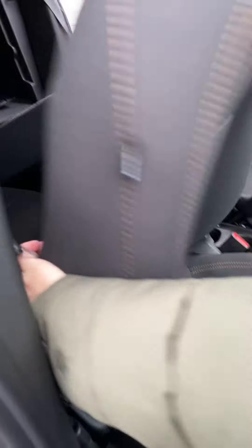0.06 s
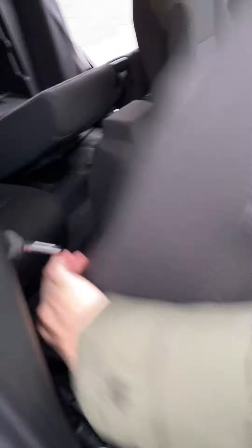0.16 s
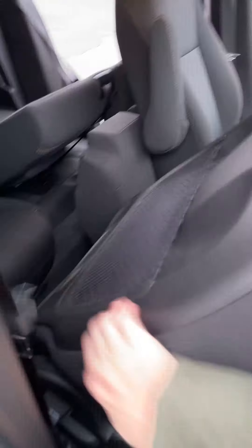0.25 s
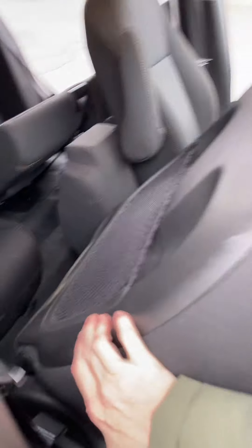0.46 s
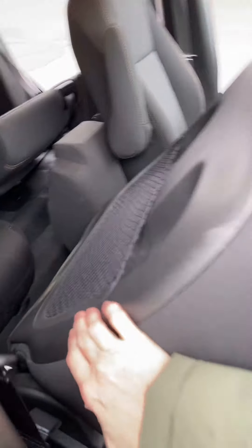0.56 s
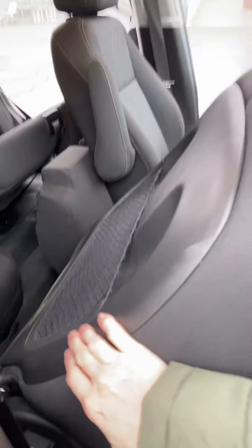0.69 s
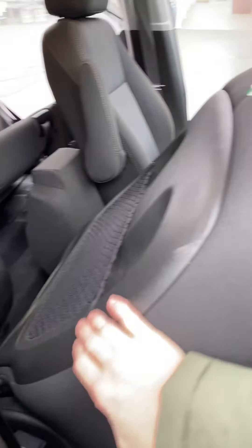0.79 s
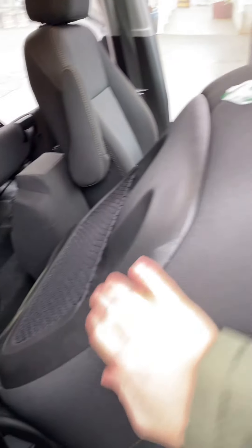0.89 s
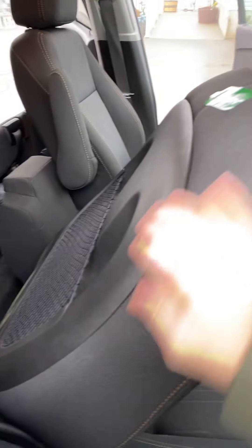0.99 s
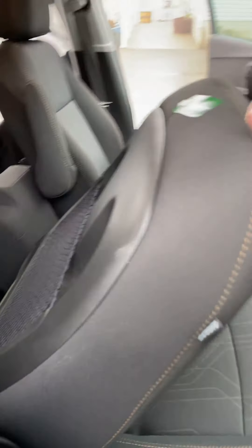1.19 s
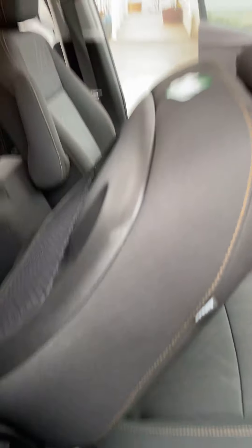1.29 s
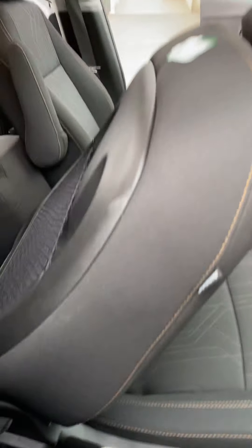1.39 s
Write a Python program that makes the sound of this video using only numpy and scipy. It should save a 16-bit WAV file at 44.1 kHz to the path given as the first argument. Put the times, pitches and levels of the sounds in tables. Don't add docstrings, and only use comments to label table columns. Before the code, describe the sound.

A car seat back folds down inside a padded cabin. Light knocks and sleeve rustle come first, then at 0.23 s a loud, slightly distorted slam of rapid blows, with low steel ring, rattle, bright cracks and a puff of air, fading by 0.4 s. Dull sagging knocks follow from 0.6 to 0.9 s, strongest near 0.75-0.85. Faint thumps come after 1.2 s over low rumble and soft street hiss.

```python
import sys
import numpy as np
from scipy import signal
from scipy.fft import rfft, irfft
from scipy.io import wavfile
from scipy.ndimage import uniform_filter1d, map_coordinates

SR = 44100
rng = np.random.default_rng(int(sys.argv[2]) if len(sys.argv) > 2 else 0)


def wrap_up_sound(samples):
    columns = np.atleast_2d(samples).T
    tamed = np.clip(columns, -1, 1)
    steps = np.round(tamed * 32767).astype(np.int16)
    wavfile.write(sys.argv[1], SR, steps)


def linear_from_db(decibels):
    return 10 ** (np.asarray(decibels, float) / 20)


N = 63945

CLOTH_FLUTTER_DB = 1.2


def unit(x):
    return x / np.sqrt(np.mean(x ** 2) + 1e-20)


def along(points, hz):
    f, v = np.transpose(points)
    return np.interp(np.log(hz + 1), np.log(f + 1), v)


def curve(rows):
    return np.interp(np.arange(N) / SR, *np.transpose(rows))


def wobble(rate):
    return map_coordinates(rng.standard_normal(300), [np.arange(N) * rate / SR])


def rush(spectrum, patchy_db):
    hz, _, z = signal.stft(rng.standard_normal(N + 2048), SR, nperseg=2048)
    patches = uniform_filter1d(rng.standard_normal(z.shape), 20, 0)
    patches = unit(uniform_filter1d(patches, 3, 1))
    colour = along([(6, -120)] + list(spectrum) + [(17000, -120)], hz)[:, None]
    noise = signal.istft(z * linear_from_db(patchy_db * patches + colour), nperseg=2048)[1]
    return unit(noise[:N])


def add(track, s, sound):
    part = track[round(s * SR):][:len(sound)]
    part += sound[:len(part)]


def attack(t, rise_s):
    return 1 - np.exp(-t / rise_s)


def smooth_attack(t, rise):
    return 1 - np.exp(-(t / rise) ** 2)


def ring(modes, hardness_hz, t):
    hz, db, t60 = np.transpose(modes)[..., None]
    luck_db = rng.normal(0, 1.6, hz.shape)
    hz = hz * np.exp(0.0523 * rng.standard_normal(hz.shape))
    swell = smooth_attack(t * hz, 1.13)
    dulling = 1 + (hz / hardness_hz) ** 2
    level = linear_from_db(db + luck_db - 60 * t / t60) / dulling
    return (level * swell * np.sin(2 * np.pi * hz * t)).sum(0)


def street_hiss():
    # t/s, level/dB
    street_level = [(0, -44), (.2, -42), (.3, -45), (.43, -47.5), (.5, -45), (.68, -48), (.8, -47),
                    (1.1, -47), (1.45, -47)]
    # f/Hz, density/dB
    hiss_tone = [(250, -2), (600, -5.5), (1700, -12), (2200, -17.5), (4500, -23), (7500, -31),
                 (11000, -35.5), (15700, -39)]
    level = linear_from_db(curve(street_level) + 2 + 1.86 * wobble(8.13))
    return level * rush([(120, -3.5)] + list(hiss_tone), patchy_db=0.85)


def rumble():
    # t/s, level/dB
    shaking = [(0, -2.5), (.2, -3.5), (.26, 6.5), (.33, 12.5), (.43, 4), (.58, 0.5), (.65, 1), (.72, 5),
               (.88, 2.5), (.96, 2), (1.08, -3.5), (1.15, -0.5), (1.3, 2.5), (1.45, -3.5)]
    # f/Hz, density/dB
    rumble_tone = [(12, -59), (20, -44), (42, -8.5), (75, -1), (130, -9.5), (182, -6.5), (248, -17.5),
                   (500, -24.5), (650, -30.5), (1100, -120)]
    level = linear_from_db(-38 + curve(shaking) + 0.7 * wobble(13.0))
    return level * rush(list(rumble_tone)[:-1] + [(900, -39)], patchy_db=1.5)


def upholstery():
    # t/s, level/dB
    rubbing = [(0, -68), (.06, -59.5), (.12, -62), (.2, -53.5), (.32, -61), (.42, -62.5), (.49, -57.5),
               (.56, -61), (.7, -64.5), (.8, -61.5), (.9, -64), (1.0, -65.5), (1.2, -78), (1.33, -78),
               (1.45, -85)]
    # f/Hz, level/dB
    cloth_tone = [(1800, -5), (3000, -2.5), (5000, -2), (7500, -7), (9000, -14.5), (12000, -28),
                  (16000, -28)]
    level = linear_from_db(curve(rubbing) + 4 + CLOTH_FLUTTER_DB * wobble(28.6))
    return level * rush(cloth_tone, patchy_db=CLOTH_FLUTTER_DB)


def sleeve():
    # t/s, level/dB
    swish = [(0, -64), (.04, -61), (.13, -65.5), (.19, -61), (.24, -55), (.32, -68), (.42, -72),
             (.48, -61.5), (.55, -64), (.58, -67), (.86, -79), (.97, -66), (1.08, -62.5), (1.17, -64),
             (1.23, -66), (1.33, -65.5), (1.36, -76), (1.45, -69)]
    # f/Hz, level/dB
    sleeve_tone = [(6000, -14), (8500, -7), (10000, -5), (11500, -1), (12800, -3.5), (14000, -2),
                   (15000, -7), (16000, -14)]
    level = linear_from_db(curve(swish) + CLOTH_FLUTTER_DB * wobble(20.6))
    return level * rush(sleeve_tone, patchy_db=CLOTH_FLUTTER_DB)


def cabin(x):
    # f/Hz, t60/s
    cabin_decay = [(100, 0.24), (1000, 0.075), (10000, 0.16)]
    hz, t, z = signal.stft(rng.standard_normal(SR // 3), SR, nperseg=256)
    fade = linear_from_db(-60 * t / along(cabin_decay, hz)[:, None])
    tail = signal.istft(z * fade, SR, nperseg=256)[1]
    late = np.pad(x, (150, 0))
    return signal.fftconvolve(late, tail / np.linalg.norm(tail))[:N]


def tick():
    # t/s, level/dB, f/Hz, t60/s
    s, db, hz, t60 = (.637, -40, 4900, .014)
    out, t = np.zeros(N), np.arange(SR // 4) / SR
    add(out, s, linear_from_db(db - 60 * t / t60) * np.sin(2 * np.pi * hz * t) * attack(t, 0.0003))
    return out


def knocks(blows, body_db):
    # f/Hz, level/dB, t60/s
    cushion = [(85, -9, 0.13), (105, 20.5, 0.088), (158, -23, 0.054)]
    sag_s, rise_cycles = 0.003, 0.7
    out, t = np.zeros(N), np.arange(SR // 4) / SR
    for s, db, hz, end_hz, cycles in blows:
        turn = end_hz * t + (hz - end_hz) * sag_s * attack(t, sag_s)
        shape = smooth_attack(turn, rise_cycles) * np.exp(-(turn / cycles) ** 4)
        thud = shape * np.sin(2 * np.pi * turn)
        boom = linear_from_db(body_db) * ring(cushion, 280, t)
        add(out, s, linear_from_db(db) * (thud + boom))
    return out


def settle_knocks():
    # t/s, peak/dB, first pitch f/Hz, last pitch f/Hz, length/cycles
    settling = [(0.588, -24, 140, 98, 1.15), (0.598, -21.5, 430, 206, 1.53), (0.615, -15.5, 360, 225, 1.4),
                (.612, -26.5, 171, 148, 2.8), (.640, -25.5, 110, 85, 1.6), (0.635, -25.5, 295, 241, 2.1),
                (0.708, -31.5, 350, 308, 2.8), (.7135, -30.5, 523, 427, 2.6), (0.715, -20.5, 260, 141, 2.4),
                (0.7449, -11, 724, 115, 2.85), (0.7609, -14.5, 250, 190, 1.8), (0.775, -22, 690, 300, 2.4),
                (0.7779, -9.5, 191, 167, 1.45), (0.7953, -20, 596, 237, 2.9), (0.807, -20.5, 151, 111, 2.6),
                (.826, -19.5, 422, 229, 2.2), (0.8351, -13, 169, 126, 1.53), (0.845, -17, 463, 121, 1.8),
                (0.86, -24, 532, 218, 1.86), (0.866, -20, 125, 100, 1.8), (.728, -21, 120, 103, 1.1),
                (.895, -32, 111, 95, 2.4), (.886, -22, 364, 196, 1.93), (0.911, -30.5, 230, 189, 3.2),
                (1.221, -30, 111, 93, 2.5), (1.239, -37.5, 203, 179, 9.5), (1.292, -34, 94, 79.5, 2.9),
                (1.363, -37, 105, 92, 2.1), (1.381, -38, 253, 181, 5.6)]
    return knocks(settling, body_db=-21)


def swing_knocks():
    # t/s, peak/dB, first pitch f/Hz, last pitch f/Hz, length/cycles
    swinging = [(.0155, -27, 880, 397, 2.94), (0.022, -26, 356, 304, 4.34), (0.098, -26, 170, 129, 2.8),
                (0.111, -29.5, 332, 305, 4.3), (0.151, -23, 303, 180, 1.13), (0.177, -25, 80, 72.6, 1.6),
                (0.2287, -7.5, 893, 817, 4.9), (0.2301, 0, 264, 227, 3.12), (0.2442, -10, 229, 183, 1.8),
                (0.2548, -4.5, 185, 145, 1.97), (0.2646, -9, 300, 247, 2.6), (.277, -8.5, 360, 315, 2.8),
                (0.243, -8.5, 87, 82, 3), (0.259, -26, 159, 160.2, 9.8), (0.2508, -8.5, 1042, 1078, 6),
                (0.325, -27, 306, 300.3, 14.8), (.287, -22, 172, 152, 3.2), (0.297, -11.5, 328, 288, 3),
                (.328, -22, 420, 386, 4.6), (0.345, -14.5, 140, 88, 2.2), (0.391, -18, 160, 90, 1.9),
                (0.456, -44, 105, 96, 1.6), (0.509, -34.5, 119, 88, 1.4)]
    return knocks(swinging, body_db=-19)


def puff():
    # f/Hz, level/dB
    puff_tone = [(2500, -11), (5000, 3.5), (9000, -3.5), (12000, -11), (14500, -15), (16000, -19)]
    out, t = np.zeros(N), np.arange(SR // 2) / SR
    add(out, 0.229, linear_from_db(-42.5) * smooth_attack(t, 0.0016) * np.exp(-(t / 0.055) ** 3))
    return out * linear_from_db(2.4 * wobble(89)) * rush(puff_tone, patchy_db=CLOTH_FLUTTER_DB)


def cracks():
    # t/s, peak/dB, t60/s
    strikes = [(0.2294, -17.5, 0.01), (0.2323, -27, 0.015), (0.2376, -33, .01), (0.242, -29, .012),
               (0.2452, -33, 0.0073), (0.253, -23, 0.015), (0.256, -26, 0.007), (0.2621, -29.5, 0.016),
               (0.271, -36, 0.013), (0.2792, -33, 0.016), (0.282, -43, .012)]
    # f/Hz, level/dB
    crack_tone = [(1500, -1), (2200, 4), (3500, 3), (5500, -14), (8500, -21), (11000, -24), (14000, -16),
                  (16000, -24)]
    bursts, t = np.zeros(N), np.arange(SR // 20) / SR
    for s, db, t60 in strikes:
        add(bursts, s, linear_from_db(db - 60 * t / t60) * attack(t, 0.0003))
    return bursts * rush(crack_tone, patchy_db=0)


def slam():
    # t/s, level/dB, hardness f/Hz, rattle level/dB
    contacts = [(0.225, -35, 900, -22.5), (0.2302, -10, 2750, -8), (.233, -10, 426, -18.5),
                (0.2377, -16, 900, -17), (0.2418, -16, 1000, -17), (0.2497, -16.5, 804, -19),
                (0.2546, -11, 2450, -11.5), (0.2641, -24.5, 790, -35), (.271, -19, 900, -33),
                (0.278, -20, 600, -25), (0.299, -22, 400, -37)]
    # f/Hz, level/dB, t60/s
    frame_modes = [(85.3, -8, 0.35), (160, -2.5, 0.14), (185.7, -7.5, 0.19), (273.4, -4, 0.077),
                   (313.4, -6.5, 0.22), (372, -5.5, 0.12), (476.7, -5, 0.078), (3500, -34, 0.022),
                   (885, -16, 0.021), (1120, -8, 0.018), (1241.5, -17.5, 0.077), (1853, -0.5, 0.014),
                   (676, -7.5, 0.029), (2470, -20, 0.013)]
    # f/Hz, density/dB
    rattle_tone = [(500, -0.5), (900, -6), (1500, -13), (2300, -19), (3500, -24.5), (5000, -35.5),
                   (8000, -67), (15000, -47)]
    frame, rattle, t = np.zeros(N), np.zeros(N), np.arange(SR // 2) / SR
    fade = linear_from_db(-60 * t / 0.02) + linear_from_db(-14.5 - 60 * t / 0.11)
    burst = fade * smooth_attack(t, 0.00054)
    for s, db, hardness_hz, rattle_db in contacts:
        add(frame, s, linear_from_db(db + 6.0) * ring(frame_modes, hardness_hz, t))
        add(rattle, s, linear_from_db(rattle_db) * burst)
    return frame + rattle * rush(rattle_tone, patchy_db=3.5)


def scene():
    background = street_hiss() + rumble() + upholstery() + sleeve()
    soft = settle_knocks() + swing_knocks() + tick()
    hit = slam() + cracks() + puff()
    tail = linear_from_db(-15.5) * cabin(hit + linear_from_db(-7) * soft)
    return (background + soft + hit + tail)[None]


def low_pass(x):
    return signal.sosfilt(signal.butter(12, 15860, fs=SR, output="sos"), x)


def record(dry):
    low_cut_hz, top_hz = 42, 15800
    clip_top, clip_hard = 0.97, 4
    x = signal.sosfilt(signal.butter(3, low_cut_hz, "high", fs=SR, output="sos"), dry)
    x = x / (1 + np.abs(x / clip_top) ** clip_hard) ** (1 / clip_hard)
    x = irfft(rfft(x) * (np.fft.rfftfreq(N, 1 / SR) < top_hz), N)
    return low_pass(x)


dry = scene()
out = record(dry)
wrap_up_sound(out)
```